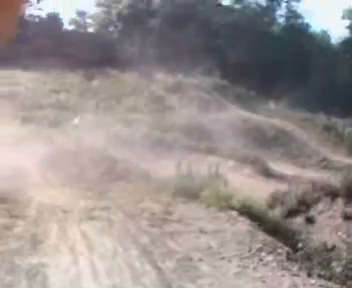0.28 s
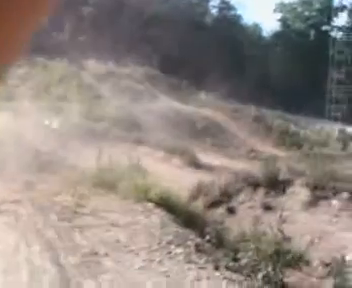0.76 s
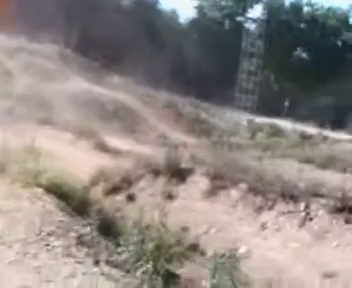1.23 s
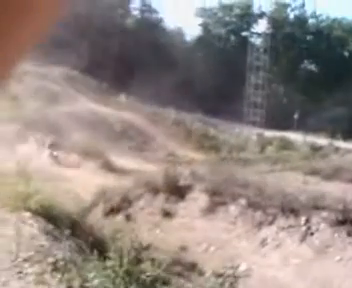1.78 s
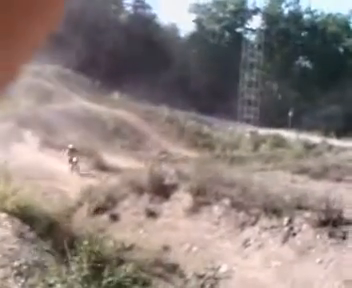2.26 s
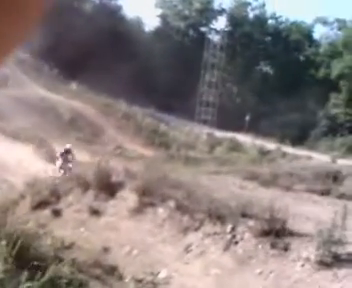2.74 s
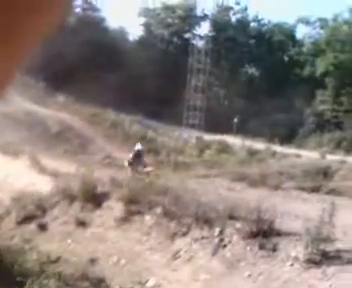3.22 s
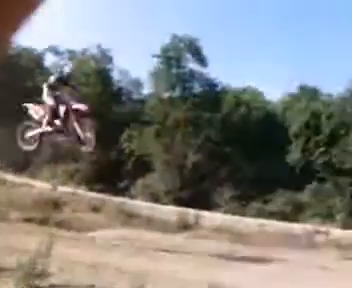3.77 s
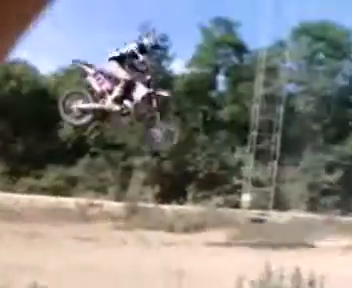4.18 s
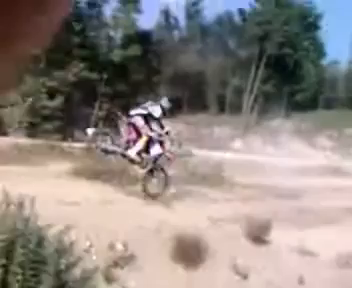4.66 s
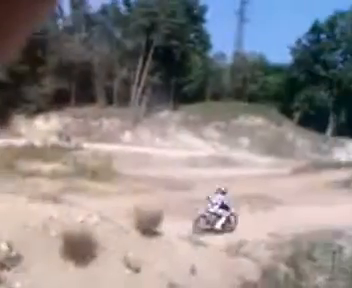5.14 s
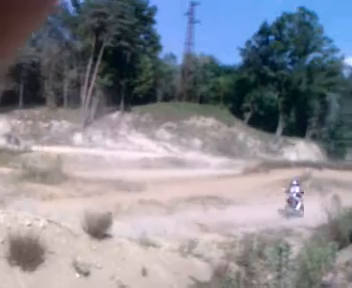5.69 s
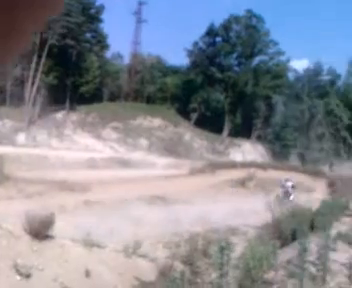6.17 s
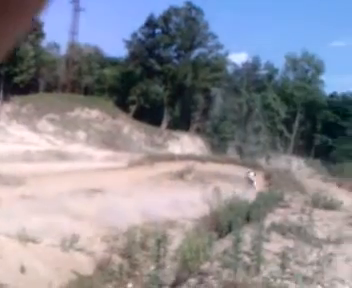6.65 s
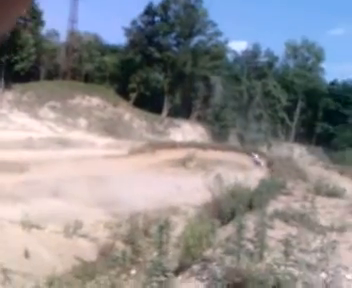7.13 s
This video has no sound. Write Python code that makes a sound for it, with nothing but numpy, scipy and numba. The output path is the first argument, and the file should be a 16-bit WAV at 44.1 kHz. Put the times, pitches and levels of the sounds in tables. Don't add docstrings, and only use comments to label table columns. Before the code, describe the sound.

Outdoors in a sand pit, a two-stroke dirt bike approaches in uneven throttle bursts, its pitch climbing to a scream before a jump. It sags in flight, loud and close, with a quick blip, then revs sharply at landing, pulls away raspy and fades. A bird squeaks briefly early and faintly at the end; dull finger taps on the small, dull, overloading microphone.

```python
import sys
import numpy as np
from scipy import signal
from scipy.fft import rfft, irfft
from scipy.io import wavfile
from scipy.ndimage import uniform_filter1d
from numba import njit

SR = 44100
rng = np.random.default_rng(int(sys.argv[2]) if len(sys.argv) > 2 else 0)


def put_to_file(sound):
    columns = np.atleast_2d(sound).T
    safe = np.clip(columns, -1, 1)
    whole_steps = np.round(safe * 32767)
    wavfile.write(sys.argv[1], SR, whole_steps.astype(np.int16))


def voltage_ratio(level):
    return 10 ** (np.asarray(level, float) / 20)


N = 326781
T = np.arange(N) / SR

# t/s, part (0 intake and cylinder, 1 frame, 2 tail pipe)
PART_FACING = [(0, 0.22), (1.4, 0.038), (2.9, .05), (3.05, 0.057), (3.3, 1.2), (3.74, 1.4), (3.8, 0.51),
               (3.9, 0.7), (4.55, 0.71), (4.62, 0.18), (4.76, 0.25), (4.93, 1.55), (5.5, 1.83), (5.7, 1.6),
               (7.41, 1.47)]
# t/s, upper resonance f/Hz, its lift/dB,
# fill of the low partials/dB, bark of the middle band/dB
CHAMBER_WAVES = [(.05, 780, 16, -1, 3), (.25, 750, 10.5, -2, 4), (.6, 760, 11.5, -1, 0),
                 (1.3, 718, 16.5, 0, 2), (1.5, 720, 16, -1, -0.5), (1.9, 734, 16, -5.5, -1.5),
                 (2.3, 836, 2.5, -5.5, -3), (2.95, 858, -15, -8, 4.5), (3.25, 704, 9, -5, 3.5),
                 (3.7, 548, -5, -7, -5.5), (3.8, 419, 18, -4.5, 5), (3.92, 698, 0.5, 3.5, 1),
                 (4.55, 600, 17.5, -7, 0), (4.65, 648, 23.5, 5.5, 1.5), (4.95, 740, 11, -6, 5.5),
                 (5.45, 650, 10, -4, -6), (6.3, 650, 9, -2, 1), (6.9, 710, 4, -4.5, -10)]
# t/s, level/dB, treble let through/dB
DISTANCE = [(0, -33, 3), (.3, -33.5, -3), (.6, -29.5, -4), (1.08, -32, -0.5), (1.41, -32, 1),
            (2.94, -29.5, 4.5), (3.31, -29.5, -8), (3.4, -25.5, 4), (3.72, -21, -5), (3.95, -20.5, 2.5),
            (4.42, -21, -2), (4.58, -26.5, 0.5), (5.55, -36, 0.5), (6.0, -46.5, 1), (6.27, -53, 1.5),
            (6.52, -49, 3), (7.0, -63.5, 6.5), (7.41, -64, 13.5)]


def unit(x):
    return x / np.sqrt(np.mean(x ** 2))


def curves(table):
    s, *columns = np.transpose(table)
    return [np.interp(T, s, c) for c in columns]


def walk(rate):
    k = int(SR / rate)
    held = np.repeat(rng.standard_normal(N // k + 1), k)
    return 1.91 * uniform_filter1d(uniform_filter1d(held, k), k)[:N]


def band(x, lo_hz, hi_hz):
    return signal.sosfilt(signal.butter(2, [lo_hz, hi_hz], "bandpass", fs=SR, output="sos"), x)


def colour(x, shape):
    hz, db = np.transpose(shape)
    bins_hz = np.arange(1, 2050) * SR / 4098
    cepstrum = irfft(np.interp(np.log(bins_hz), np.log(hz), db) * np.log(10) / 20)
    cepstrum[1:2048] *= 2
    cepstrum[2049:] = 0
    return signal.fftconvolve(x, irfft(np.exp(rfft(cepstrum)))[:1024])[:N]


def ring(x, resonances):
    out = x
    for hz, width, db in resonances:
        out = out + (voltage_ratio(db) - 1) * signal.lfilter(*signal.iirpeak(hz, hz / width, SR), x)
    return out


def split(x, edges_hz, octaves):
    pitch = np.log2(np.arange(1, N // 2 + 2) * SR / N)
    above = [1] + [.5 + .5 * np.tanh((pitch - np.log2(hz)) / octaves) for hz in edges_hz] + [0]
    return [irfft(rfft(x) * (a - b), N) for a, b in zip(above, above[1:])]


@njit
def svf(x, hz, k):
    high, mid, b, l = np.empty(len(x)), np.empty(len(x)), 0., 0.
    for i in range(len(x)):
        g = np.tan(np.pi * hz[i] / SR)
        v = (b + g * (x[i] - l)) / (1 + g * (g + k))
        high[i], mid[i] = x[i] - k * v - l - g * v, k * v
        b, l = 2 * v - b, l + 2 * g * v
    return high, mid


def revs():
    # start t/s, end t/s, from f/Hz, to f/Hz, sag bend (1 even, over 1 quick at first)
    run_up = [(0.036, 0.133, 107.1, 112.3, 0.89), (0.338, 0.479, 90.7, 136.9, 1.18),
              (0.721, 0.781, 116.6, 121.6, 1.08), (0.891, 0.943, 114.3, 120.7, .4),
              (1.112, 1.213, 95.65, 100.1, 0.99), (1.304, 1.375, 121.1, 122.2, 1.16),
              (1.431, 1.498, 116, 142.8, 0.52), (1.731, 1.815, 135.4, 144.2, 1.13),
              (1.869, 2.039, 131.2, 153.4, 1.18), (2.1, 2.14, 149.9, 165.6, 1.23),
              (2.188, 2.24, 160.2, 173.9, 1), (2.309, 2.51, 175, 212.9, 1.08),
              (2.547, 2.619, 200.5, 226.5, 1.25), (2.661, 2.732, 205.1, 229.1, .7),
              (2.783, 2.842, 203.4, 217, 1.167), (2.867, 2.885, 209.7, 206.4, 2.53),
              (2.95, 3.041, 145.1, 171.6, 1.17), (3.102, 3.259, 167, 175.7, 1.2)]
    # start t/s, end t/s, from f/Hz, to f/Hz, sag bend
    away = [
        (3.333, 3.672, 150.3, 125.4, 1.53),
        (3.753, 3.901, 124.4, 185.6, 1.3),
        (4.005, 4.06, 173.8, 172.6, 1.15),
        (4.579, 4.759, 136.1, 211.6, 1.4),
        (4.873, 4.912, 227, 230.7, 5.5),
        (5.274, 5.458, 165.3, 185.9, .6),
        (5.573, 5.669, 175, 168.5, 1.1),
        (5.749, 6.178, 140.2, 121.1, 1.2),
        (6.286, 6.384, 103.9, 137.5, .4),
        (6.692, 7.05, 104.1, 87.2, 0.5),
    ]
    idle_hz = 83
    start, end, low, high, bend = np.transpose(run_up + away)
    hz = np.interp(T, np.ravel([start, end], "F"), np.ravel([low, high], "F"))
    for a, b, top, bottom, k in zip(end, [*start[1:], T[-1]], high, [*low[1:], idle_hz], bend):
        left = np.clip((b - T) / (b - a), 0, 1)
        bent = left ** k if k > 1 else 1 - (1 - left) ** (1 / k)
        hz = np.where((T > a) & (T <= b), bottom + (top - bottom) * bent, hz)
    return uniform_filter1d(hz, size=500)


def rider():
    openings = [(0.0, 0.108, 8, 6, .1), (0.359, 0.471, 3.5, 10.5, 0.5), (0.51, 0.852, 1.5, 0, 0.3),
                (0.917, 1.011, 3.5, 5, 0.02), (1.128, 1.309, 0.5, 9.5, 0.15),
                (1.442, 1.76, 10.5, 12.5, 0.3), (1.76, 2.098, 13, 15.5, .4), (2.1, 2.5, 17.5, 15, 0.39),
                (2.504, 2.684, 15.5, 18, 0.45), (2.69, 2.799, 13.5, 18, 0.37), (2.826, 2.93, 11, 0.5, 0.7),
                (2.972, 3.028, 7.5, 12, 0.6), (3.023, 3.243, 7.5, 5.5, 1), (3.789, 3.88, 12, 9, 0),
                (4.601, 4.712, 12, 19, 0.05), (4.7, 4.931, 14, 6, 0.38), (4.953, 5.154, 12, 6, 0.83),
                (5.143, 5.513, 7, 13, 0.71), (6.097, 6.107, 2, 4.5, 0.5), (6.319, 6.44, 8.5, 5.5, 0.4)]
    open_s, shut_s = 0.016, 0.037
    opened = lift_db = load = 0
    for a, b, first_db, last_db, pull in openings:
        on = np.clip(np.minimum(1 + (T - a) / open_s, 1 - (T - b) / shut_s), 0, 1)
        opened = opened + on
        lift_db = lift_db + on * np.interp(T, [a, b], [first_db, last_db])
        load = load + on * pull
    both = np.maximum(opened, 1)
    return opened / both, lift_db / both, load / both


def firings(hz, jitter, scatter_db):
    turns = np.cumsum(hz / SR)
    count = np.arange(1, int(turns[-1]) - 1)
    lateness, unevenness = rng.standard_normal((2, len(count)))
    rough = np.interp(count, turns, jitter)
    at = np.interp(count + rough * lateness, turns, np.arange(N))
    size = voltage_ratio(scatter_db * unevenness) / np.sqrt(np.interp(count, turns, hz))
    clicks, whole = np.zeros(N), at.astype(int)
    np.add.at(clicks, whole, size * (1 - at + whole))
    np.add.at(clicks, whole + 1, size * (at - whole))
    return clicks, turns


def rattle(cracks, t60_s, drift):
    t = T[:2048]
    out, power = 0, 0
    for _ in range(4):
        weight = walk(drift)
        scatter = rng.standard_normal(len(t)) * voltage_ratio(-60 * t / t60_s)
        out = out + weight * unit(signal.fftconvolve(cracks, scatter)[:N])
        power = power + weight ** 2
    return out / np.sqrt(power)


def turned(x):
    # f/Hz, level/dB per Hz
    bike_colour = [(150, -25), (250, 2.5), (413, -2.5), (491, -11), (692, -4), (787, -7), (990, -5),
                   (1110, -12), (1420, -8.5), (2310, -9.5), (2740, -8), (4660, -16), (5460, -5),
                   (6960, -3.5), (7700, -14.5), (10000, -26.5), (16900, -120)]
    # f/Hz, width/Hz, lift/dB
    parts = [
        [(1012, 87, 9), (1522, 92, 7.5), (2014, 364, 12.5), (2420, 140, 5), (3200, 76, 3)],
        [(1340, 290, 7.5), (1780, 98, 5), (2260, 120, 12.5), (3120, 73, 8.5), (4340, 440, 7.5)],
        [(1450, 150, 4.5), (4370, 310, 4.5), (1550, 450, 10.5), (2405, 51, 15.5), (2984, 55, 15)],
    ]
    facing, = curves(PART_FACING)
    x = colour(x, bike_colour)
    return sum(np.clip(1 - abs(facing - k), 0, 1) * unit(ring(x, part)) for k, part in enumerate(parts))


def partial_db(hz, answer, law, rasp_db, opened, load):
    at, db = np.transpose(answer)
    far = np.maximum(-41 - curves(DISTANCE)[0], 0)
    causes = load, curves(PART_FACING)[0], far, opened - 1, curves(CHAMBER_WAVES)[2]
    return rasp_db + np.interp(hz, at, db) + sum(k * cause for k, cause in zip(law, causes))


def chamber_boom(hz, turns, rasp_db, opened, load):
    # f/Hz, level/dB
    first_answer = [(78, -27), (92, -11.5), (110, -19.5), (140, -16), (170, -13.5), (215, -9)]
    second_answer = [(170, -9), (205, 0), (240, -8), (280, -12), (340, -17), (450, -11)]
    first_law = (11.9, 0.32, 0.9, 0.5, 0.033)
    second_law = (2.8, 7.5, 0.049, 5.8, 1.3)
    first_db = partial_db(hz, first_answer, first_law, rasp_db, opened, load)
    second_db = partial_db(2 * hz, second_answer, second_law, rasp_db, opened, load)
    boom = voltage_ratio(first_db + 1.0 * walk(30)) * np.sin(2 * np.pi * turns + 0.18 * walk(40))
    boom += voltage_ratio(second_db + 0.25 * walk(30)) * np.sin(4 * np.pi * turns + 0.69 * walk(40))
    churn = unit(band(rng.standard_normal(N), 170, 420)) * voltage_ratio(np.maximum(first_db, second_db) - 19.5)
    return np.sqrt(2) * boom + churn


def bike():
    # level/dB, under full load/dB, per step of facing/dB
    bark = (-11.5, 5.9, 4.8)
    sizzle = (-8, -0.5, 0.27)
    hz = revs()
    opened, throttle_db, load = rider()
    coasting_db, treble_db = curves(DISTANCE)
    facing, = curves(PART_FACING)
    rasp_db = coasting_db + throttle_db
    bark_db, sizzle_db = (rasp_db + db + pull * load + turn * facing for db, pull, turn in (bark, sizzle))

    working = np.interp(load, [.1, .4, .9], [.48, .12, .07])
    coasting = np.interp(coasting_db, [-63, -50, -34], [.65, .24, .2])
    gas = opened * working + (1 - opened) * coasting
    cracks, turns = firings(hz, .002 + .012 * gas, scatter_db=1.0)
    sharp = np.interp(facing, [0, 1, 2], [.12, .12, .9]) * (1 - gas)
    spread = np.sqrt(1 - sharp) * rattle(cracks, t60_s=.035, drift=5.0) + np.sqrt(sharp) * unit(cracks)
    cracks = spread + split(unit(cracks) - .6 * spread, [1000], .2)[0]
    puffs = rng.standard_normal(N) * (11.0 + np.exp(-(turns % 1) / 3.6))
    cracks, puffs = (split(turned(x), [1100, 4400], .15) for x in (cracks, puffs))
    chamber_hz, lift_db, _, swell_db = curves(CHAMBER_WAVES)
    cracks[0] = cracks[0] + (voltage_ratio(lift_db) - 1) * svf(cracks[0], chamber_hz, 0.069)[1]

    out = 0
    levels_db = bark_db + swell_db, rasp_db, sizzle_db + treble_db
    for db, crack, puff, tilt in zip(levels_db, cracks, puffs, (1.3, 1, .3)):
        share = gas ** tilt
        mixed = np.sqrt(1 - share) * unit(crack) + np.sqrt(share) * unit(puff)
        out = out + voltage_ratio(db + .8 * walk(25.215)) * mixed
    out = svf(svf(out, 3.8 * hz, 1.24)[0], 2.0 * hz, 1.17)[0]
    return out + chamber_boom(hz, turns, rasp_db, opened, load)


def banks(x):
    t60_s, level_db = .3, -15
    t = T[:SR // 2]
    tail = rng.standard_normal(len(t)) * voltage_ratio(-60 * t / t60_s) * (t > .012)
    return voltage_ratio(level_db) * signal.fftconvolve(x, tail / np.sqrt(np.sum(tail ** 2)))[:N]


def wind():
    # t/s, peak level/dB, length/s
    rumble_bursts = [(.15, -55, 0.17), (0.927, -37, 0.064), (1.91, -55, 0.58), (2.587, -44, 0.053),
                     (3.804, -40.5, 0.049), (4.674, -42, 0.063), (4.95, -48, 0.0443), (5.63, -63, 0.068),
                     (6.127, -68, 0.067), (7.41, -60, .1)]
    # t/s, level/dB
    breeze = [(0, -53), (3.7, -53), (4.1, -69), (7.41, -85.5)]
    blow = voltage_ratio(curves(breeze)[0])
    blow = blow + sum(voltage_ratio(db) * np.exp(-((T - s) / length) ** 2) for s, db, length in rumble_bursts)
    return unit(band(rng.standard_normal(N), 25, 150)) * blow * voltage_ratio(2.2 * walk(24))


def wash():
    # f/Hz, level/dB per Hz
    pit_colour = [(35, -56.5), (60, -19.5), (92, -33.5), (125, -23.5), (293, -18.5), (430, -33),
                  (457, -30.5), (950, -34), (3020, -28.5), (6410, -56.5), (7700, -57), (10000, -87),
                  (16900, -120)]
    noise = ring(colour(rng.standard_normal(N), pit_colour), [(2950, 80, 4.2)])
    return unit(noise) * voltage_ratio(-47.5 - 5.0 + 0.47 * walk(54))


def bird():
    # t/s, f/Hz, level/dB, hoarseness (0-1)
    calls = [
        [(1.336, 1090, -40, .05), (1.340, 1090, -7, .02), (1.348, 1080, -7, .05), (1.354, 1060, -9, .35),
         (1.361, 1082, -8, .1), (1.371, 1092, -9, .1), (1.375, 1085, -21, .3), (1.39, 1080, -32, .3)],
        [(7.262, 1085, -54, .2), (7.272, 1082, -53, .2), (7.275, 1080, -43, .15), (7.286, 1075, -51, .2),
         (7.297, 1070, -58, .15)],
        [(7.304, 1062, -57, .15), (7.322, 1058, -45, .14), (7.342, 1052, -43, .15), (7.352, 1050, -51, .25),
         (7.375, 1050, -57, .25)],
    ]
    # multiple of the pitch, level/dB
    near_partials = [(1, -15), (2, 0), (3, -24), (4, -33), (5, -31), (6, -29)]
    far_partials = [(1, -10), (2, 0), (3, -4), (4, -15), (5, -19), (6, -22)]
    out = 0
    for call, partials, hiss_db in zip(calls, [near_partials, far_partials, far_partials], [-5, 12, 12]):
        hz, db, hoarse = curves(call)
        phase = np.cumsum(2 * np.pi * hz * (1 + .2 * hoarse * walk(900)) / SR)
        stack = sum(voltage_ratio(g) * np.sin(k * phase) for k, g in partials)
        rasp = unit(band(rng.standard_normal(N), 2500, 7500)) * voltage_ratio(hiss_db) * hoarse
        on = (T > call[0][0]) & (T < call[-1][0])
        out = out + on * voltage_ratio(db) * (np.sqrt(2) * stack * (1 + .5 * hoarse * walk(530)) + rasp)
    return out


def knocks():
    # t/s, peak level/dB, f/Hz
    taps = [
        (6.095, -43, 248.8),
        (6.881, -40, 151),
        (6.949, -45, 168),
        (7.171, -46, 172),
        (7.377, -36, 225),
        (7.398, -40, 275),
    ]
    out = 0
    for s, db, hz in taps:
        t = np.maximum(T - s, 0)
        scrape = .5 * (t > 0) * band(rng.standard_normal(N), 303, 3100)
        out = out + voltage_ratio(db) * np.exp(-t / 0.0073) * (np.sin(2 * np.pi * hz * t) + scrape)
    return out


def scene():
    engine = bike()
    return (engine + banks(engine) + wind() + wash() + bird() + knocks())[None]


def band_limit(x):
    return signal.sosfilt(signal.butter(12, 15870, fs=SR, output="sos"), x)


def record(dry):
    mic_rate_hz = 16000
    x = 1.05 * np.tanh(dry / 1.05)
    x = signal.sosfilt(signal.ellip(8, .3, 70, 7550, fs=SR, output="sos"), x)
    mirror_band = signal.ellip(4, 3, 60, [8330, 8950], "bandpass", fs=SR, output="sos")
    mirror = signal.sosfilt(mirror_band, x * np.cos(2 * np.pi * mic_rate_hz * T))
    return band_limit(np.clip(x + voltage_ratio(-13) * mirror, -.765, .765))


dry = scene()
out = record(dry)
put_to_file(out)
```